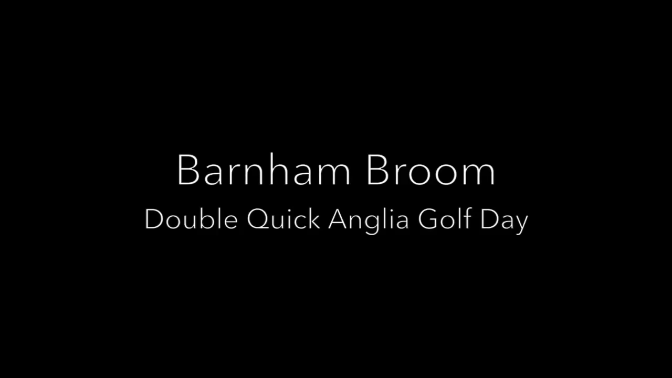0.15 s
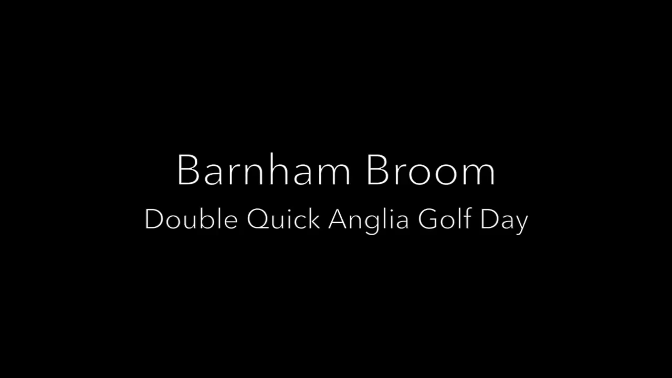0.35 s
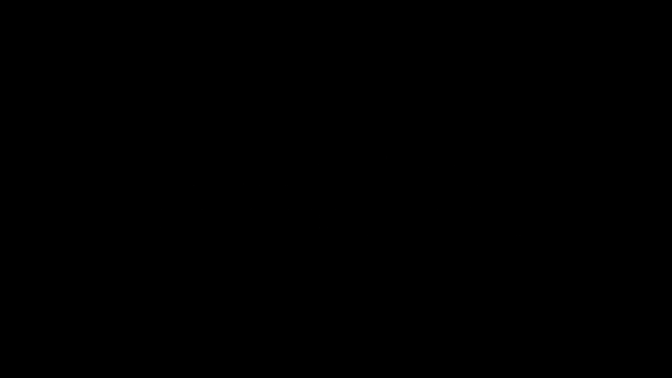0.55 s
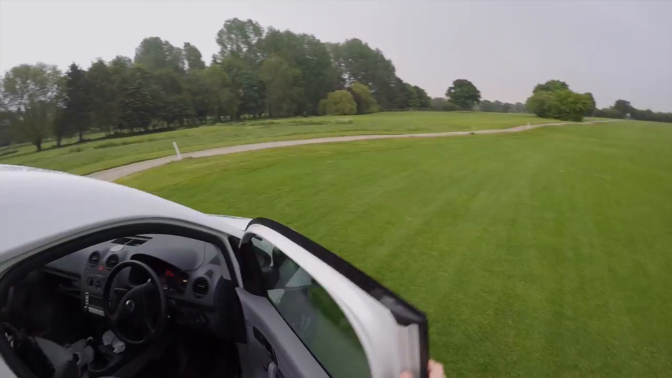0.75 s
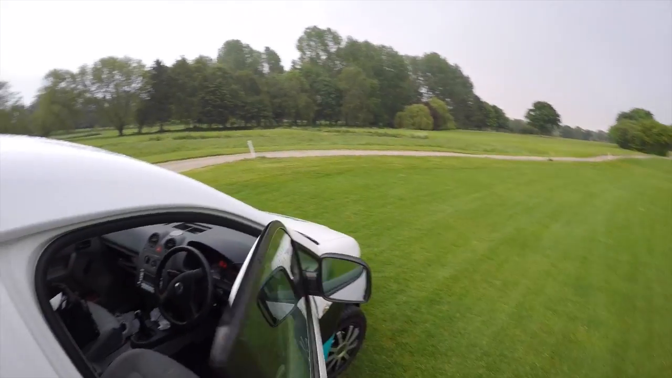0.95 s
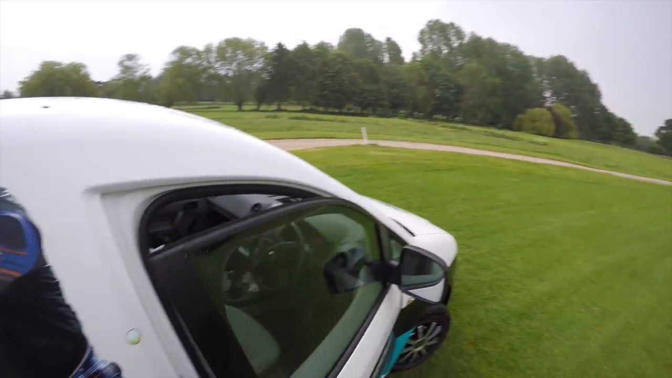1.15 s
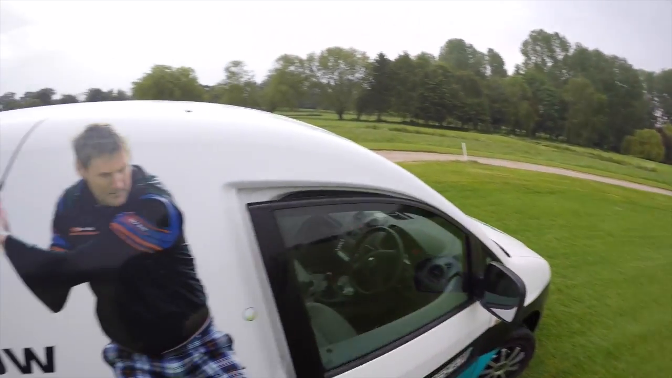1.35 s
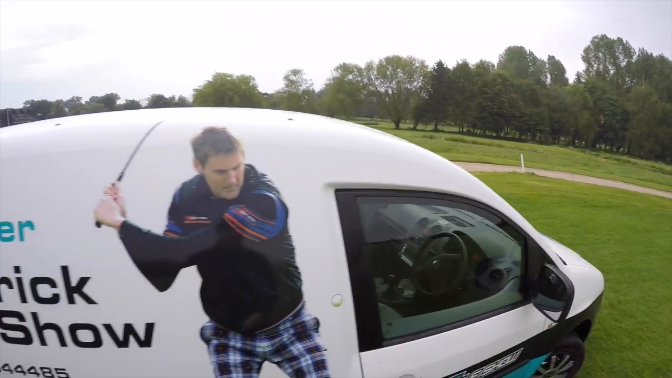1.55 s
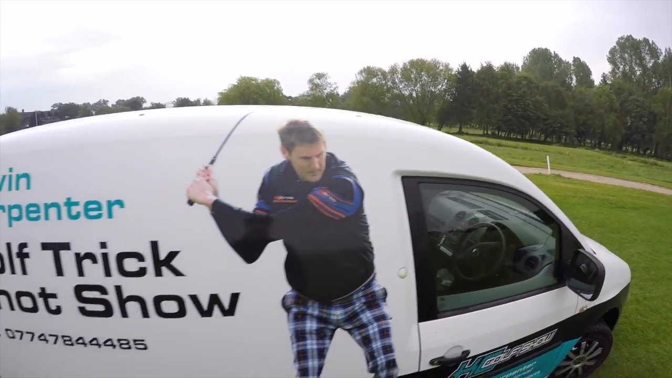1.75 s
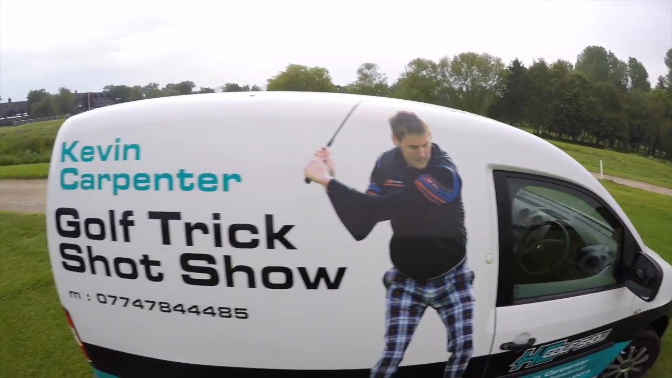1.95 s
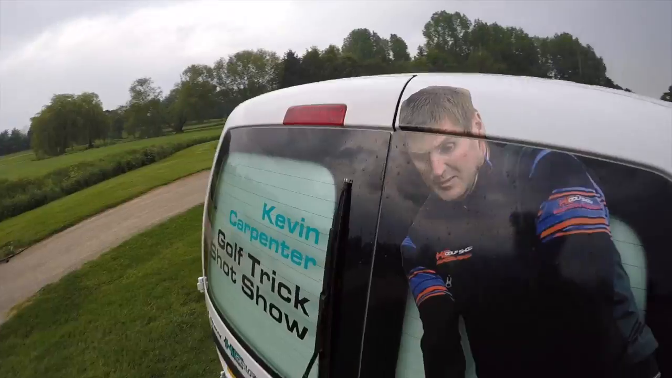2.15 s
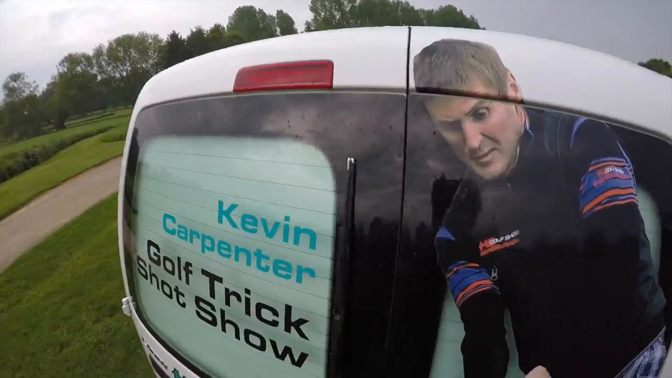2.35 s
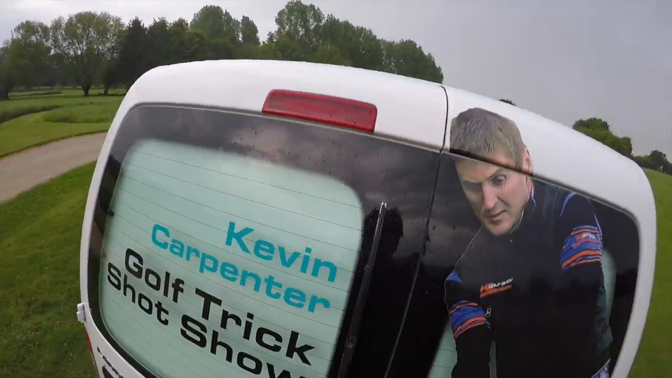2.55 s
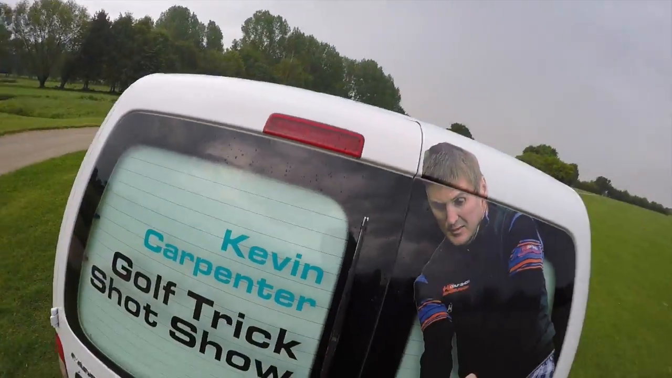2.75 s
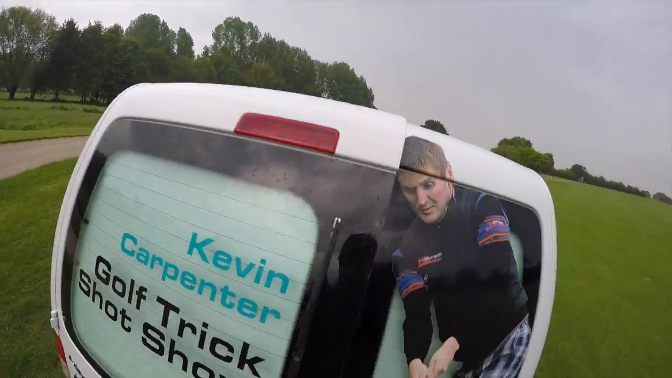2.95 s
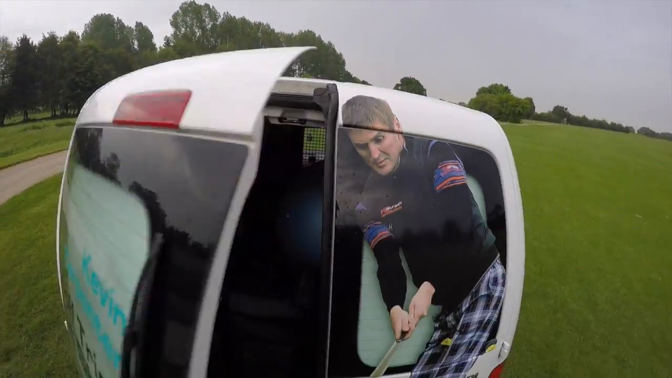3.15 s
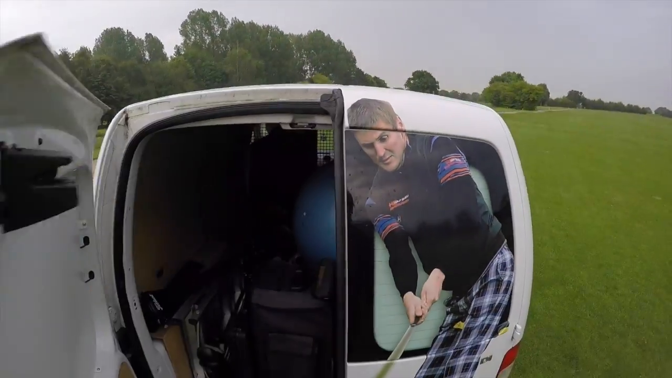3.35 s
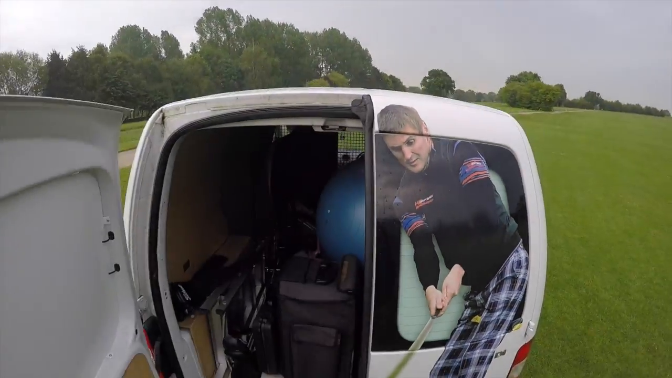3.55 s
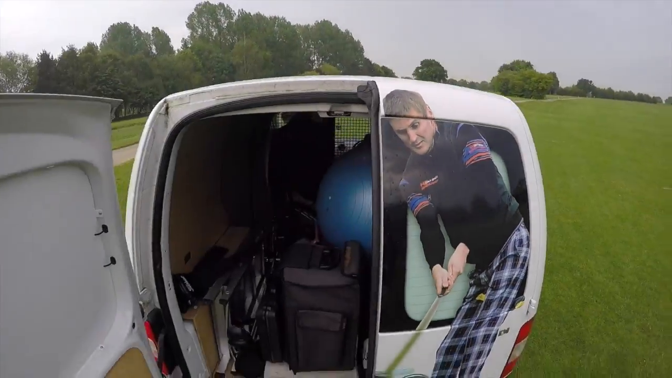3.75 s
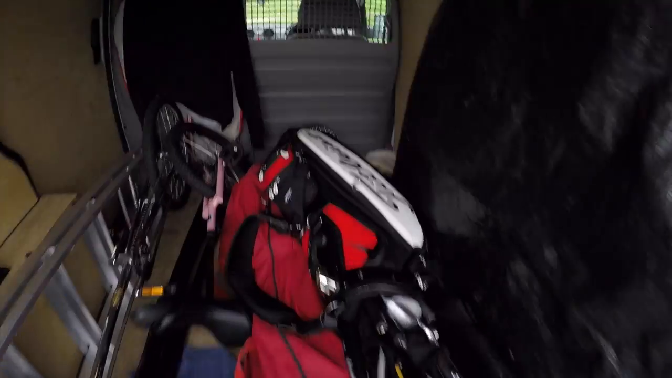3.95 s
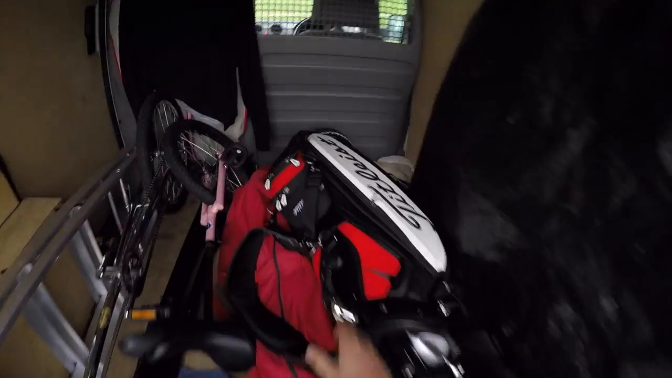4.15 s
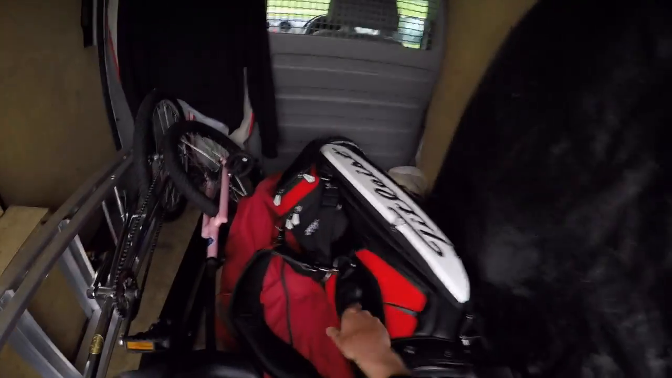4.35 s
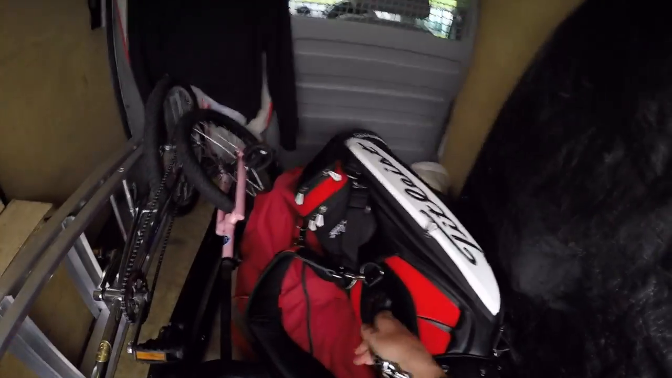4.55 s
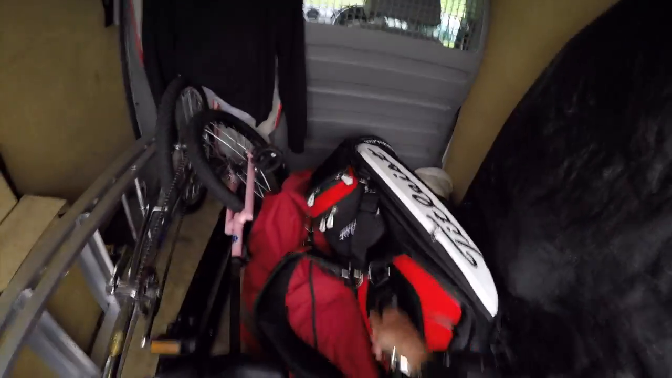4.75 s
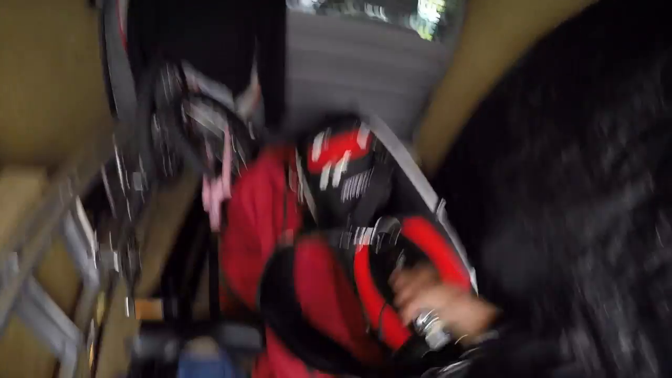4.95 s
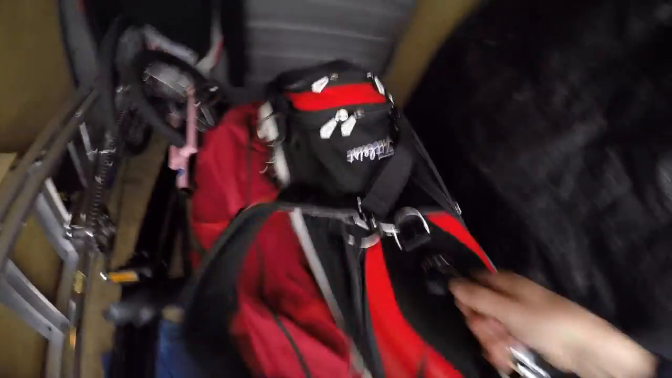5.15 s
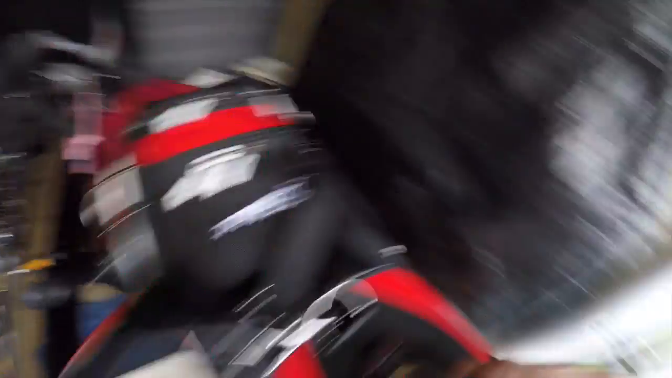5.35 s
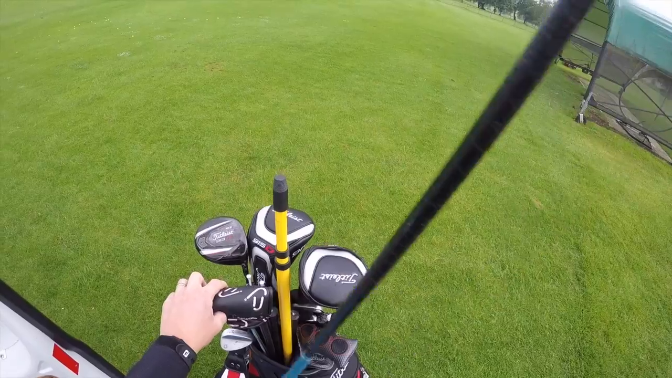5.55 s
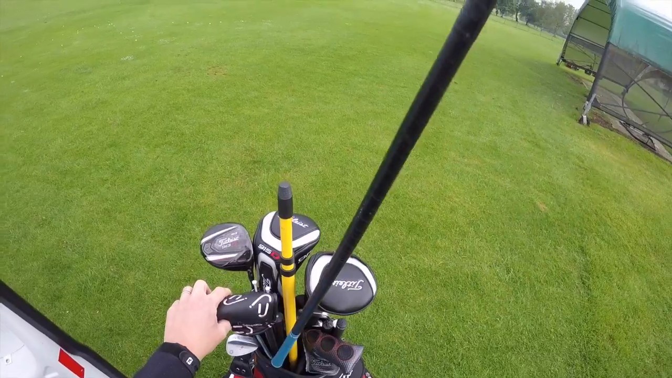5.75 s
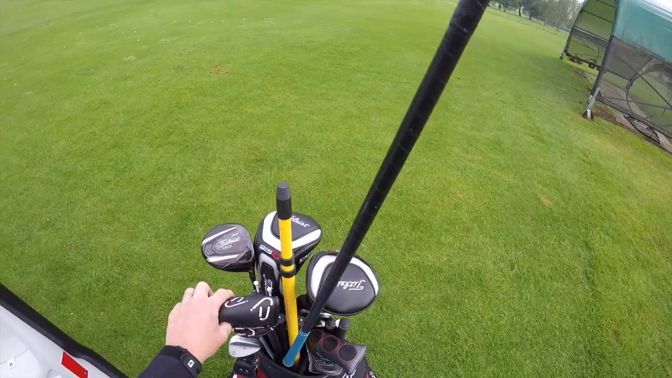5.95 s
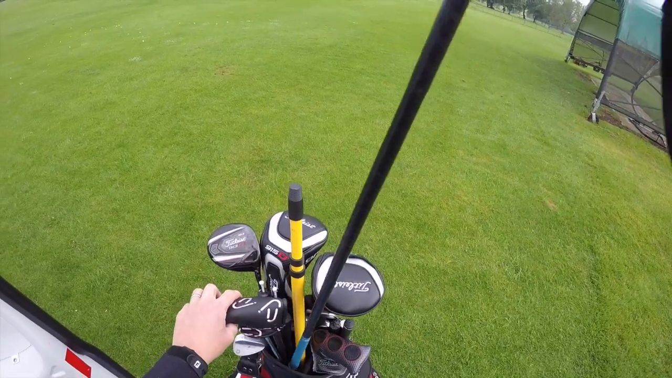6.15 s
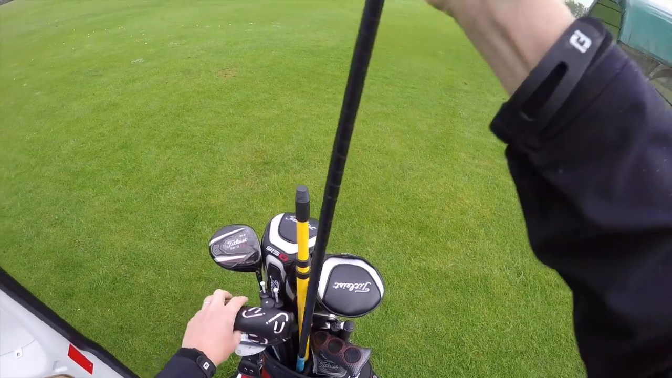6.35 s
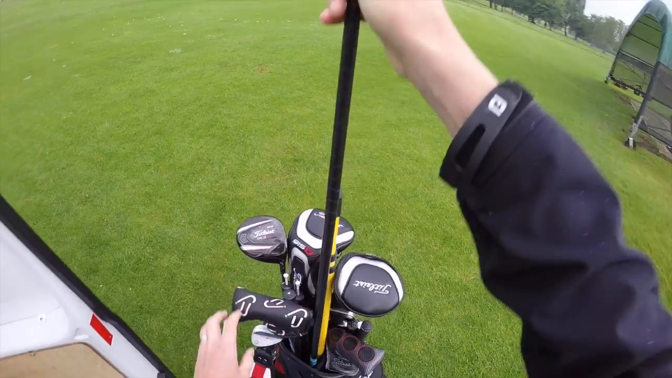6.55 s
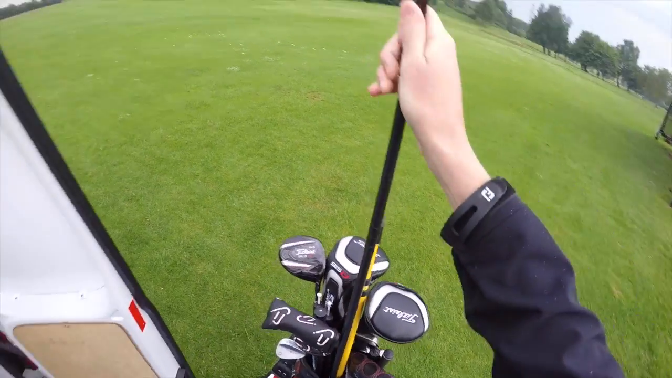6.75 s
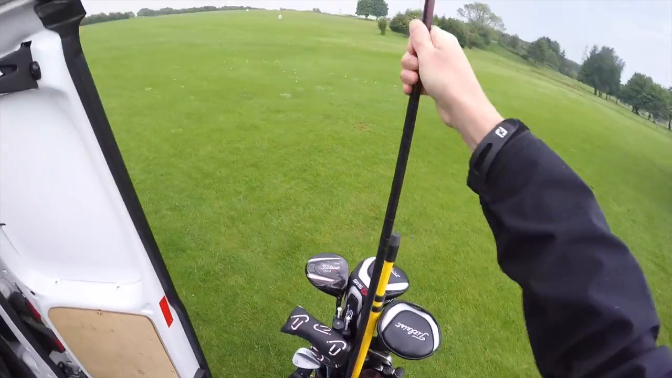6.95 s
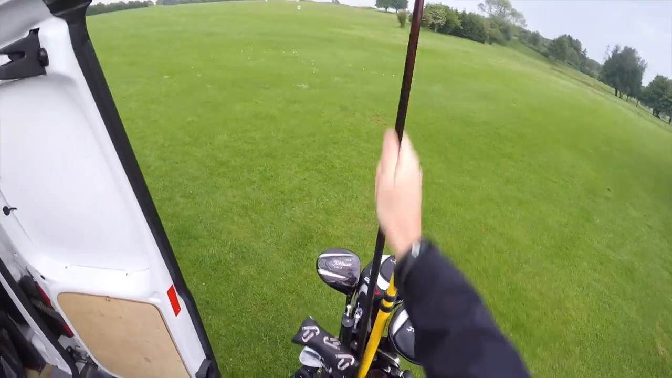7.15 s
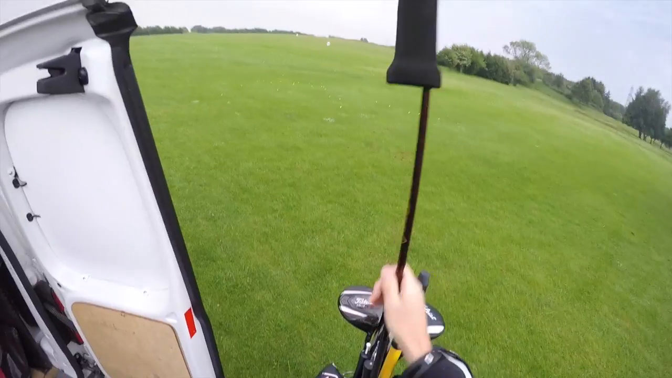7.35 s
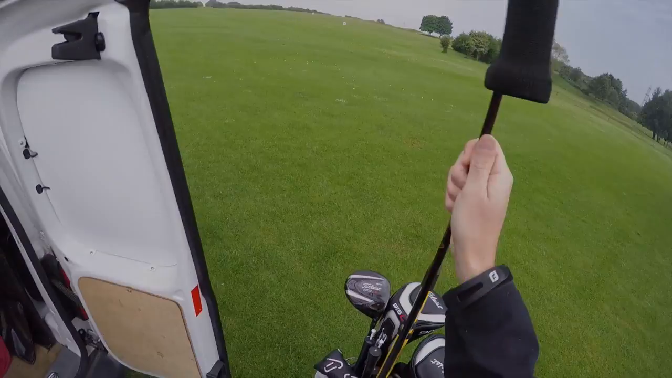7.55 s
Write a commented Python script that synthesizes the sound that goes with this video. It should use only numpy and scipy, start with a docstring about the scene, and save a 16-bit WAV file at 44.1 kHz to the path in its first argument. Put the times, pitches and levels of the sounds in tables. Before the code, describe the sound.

A boomy vehicle door slam, a metallic latch clunk and creak, then golf clubs knocking and nylon dragging, with faint birds in open air.

```python
"""A van's cab door is slammed, then its rear door unlatches and swings onto its stay: modal ringing.
A nylon golf bag is dragged over the load floor by stick-slip grains while a club head pings.
Clubs knock and jostle in it before, during and after the drag; a shaft slides out late; a sleeve rustles.
Shaped noise makes the breeze and open air of the golf course; gliding sines make its far-off birds.
All is heard at one cased microphone worn by the person."""
import sys
import numpy as np
from scipy import signal
from scipy.fft import rfft, irfft, next_fast_len
from scipy.io import wavfile
from scipy.ndimage import uniform_filter1d

SR = 44100
rng = np.random.default_rng(int(sys.argv[2]) if len(sys.argv) > 2 else 0)


def digitize_waveform(pressure):
    """Quantize a signal to 16-bit integers and store it at the path in sys.argv[1].

    Rows of a 2-D input are taken as channels; values are limited to [-1, 1].
    """
    field = np.atleast_2d(pressure).T
    bounded = np.clip(field, -1, 1)
    quanta = np.round(bounded * 32767).astype(np.int16)
    wavfile.write(sys.argv[1], SR, quanta)


N = 334586
TIME = np.arange(N) / SR
RING = 20480  # samples in one ringing sound


def undb(db):
    """Level: decibels become an amplitude ratio."""
    return 10 ** (np.asarray(db) / 20)


def unit(x, size=None):
    """Normalisation: rms 1 over the first samples, or over all."""
    return x / np.sqrt(np.mean(x[:size] ** 2) + 1e-24)


def curve(rows, axis=1):
    """Linear interpolation of a table column in time."""
    rows = np.array(rows)
    return np.interp(TIME, rows[:, 0], rows[:, axis])


def swell(rows, axis=1):
    """Amplitude envelope from a dB column, silent outside its span, with softened ends."""
    inside = (TIME >= rows[0][0]) & (TIME <= rows[-1][0])
    return undb(curve(rows, axis)) * uniform_filter1d(1. * inside, size=400)


def strokes(rows, attack_s, release_s, axis=2):
    """Energy summation of movements: each rises, holds, then falls 30 dB per release time."""
    power = np.zeros(N)
    for row in rows:
        start, length = row[:2]
        rise = np.sin(np.pi / 2 * np.clip((TIME - start) / attack_s, 0, 1)) ** 2
        fall = undb(-30 * np.maximum(TIME - start - length, 0) / release_s)
        power += (undb(row[axis]) * rise * fall) ** 2
    return np.sqrt(power)


def at_hz(points, hz):
    """Linear interpolation of (Hz, value) points on a log-frequency axis."""
    f, value = np.transpose(points)
    return np.interp(np.log(hz + 1e-9), np.log(f), value)


def colour(x, points):
    """Spectral shaping by multiplication in the frequency domain, at rms 1."""
    size = next_fast_len(N)
    gain = undb(at_hz(points, np.fft.rfftfreq(size, 1 / SR)))
    return unit(irfft(rfft(x, size) * gain, size)[:N])


def butter(x, hz, kind):
    """Fourth-order low- or high-pass filtering."""
    return signal.sosfilt(signal.butter(4, hz, kind, fs=SR, output="sos"), x)


def walk(rate):
    """Random modulation: smoothed chance, drawn anew at the given rate per second, at rms 1."""
    k = int(SR / rate)
    return unit(uniform_filter1d(np.repeat(rng.standard_normal(N // k + 1), k), k)[:N])


def grains(rate, spread_db):
    """Impulsive excitation: tiny random slips per second, of very unequal size, at rms 1."""
    chance, size, sign = rng.random(N), rng.exponential(size=N), rng.standard_normal(N)
    return unit((chance < rate / SR) * np.sign(sign) * undb(spread_db * np.minimum(size, 5)))


def add(out, s, sound):
    """Superposition of a sound at a given time."""
    i = int(s * SR)
    out[i:i + len(sound)] += sound[:N - i]


def ring(modes, detune=0):
    """Modal superposition: exponentially decaying sines, each optionally pulled off pitch."""
    t = TIME[:RING]
    pull = 1 + detune * rng.standard_normal(len(modes))
    out = np.zeros(RING)
    for (hz, db, t60), p in zip(modes, pull):
        out += undb(db) * np.sin(2 * np.pi * hz * p * t) * np.exp(-np.log(1000) * t / t60)
    return out


def taps(events, modes):
    """Impulse response: every tap rings the same modes of one object."""
    out, sound = np.zeros(N), ring(modes)
    for s, db in events:
        add(out, s, undb(db) * sound)
    return out


def blows(events, modes, spectrum, decay, modes_db, tail_db, favour_db):
    """Modal density: a blow excites clear modes among countless dense ones, and a hard contact crack."""
    t, out = TIME[:RING], np.zeros(N)
    hz = np.fft.rfftfreq(RING, 1 / SR) + 1e-9
    centres = 125 * 2. ** np.arange(8)
    overlap = np.maximum(0, 1 - np.abs(np.log2(hz / centres[:, None])))
    octaves = overlap * undb(at_hz(spectrum, hz))
    fall = np.log(1000) * t / at_hz(decay, centres)[:, None]
    contact = 1 - np.exp(-(t / 0.00045) ** 2)
    for s, db, click_db, favoured_hz, length in events:
        length = max(length, .2)

        def favour(f):
            """Mode coupling: the place that is struck favours one group of modes."""
            return favour_db * np.exp(-(np.log2(f / favoured_hz) / 0.22) ** 2)

        phases = np.exp(2j * np.pi * rng.random(len(hz)))
        bands = irfft(octaves * undb(favour(hz)) * phases)
        # most of the energy radiates at once, a weak part lingers
        late = np.exp(-fall / length)
        dense = (bands * (late ** 3 + undb(tail_db) * late)).sum(axis=0) * contact
        struck = [(f, mode_db + favour(f), t60 * length) for f, mode_db, t60 in modes]
        clear = unit(ring(struck, detune=.008) * contact, size=500)
        body = unit(butter(dense, 1500, "low"), size=500) + undb(modes_db) * clear
        click = unit(butter(dense, 1500, "high"), size=400)
        sound = unit(body, size=500) + undb(click_db) * click
        add(out, s, undb(db) * sound / np.sqrt(8))  # peaks stand about 9 dB over the rms
    return out


# wind rumble spectrum: f/Hz, level/dB
BUFFET = [(10, -29), (20, 5.5), (36, 1), (58, 5), (85, -2), (110, -11.5), (240, -27.5), (400, -34.5),
          (900, -96)]
# gusts, before the trims in wind(): peak t/s, Gaussian half-width/s, level/dB
GUSTS = [(.75, 0.11, -32.5), (1.08, .11, -27), (1.26, 0.025, -32.5), (1.68, 0.17, -30.5),
         (2.33, 0.077, -27), (2.5, 0.081, -33), (2.95, 0.11, -33.5), (4.65, 0.036, -40), (4.96, 0.12, -29),
         (5.42, 0.086, -35.5), (5.78, 0.061, -37.5), (6.3, 0.18, -50)]
BREEZE_DB = -45  # steady breeze, before the same trims


def wind():
    """Turbulent pressure: eddies rumble at the microphone; stronger gusts shed smaller, higher ones."""
    power = undb(BREEZE_DB) ** 2
    for s, width, db in GUSTS:
        power = power + (undb(db) * np.exp(-((TIME - s) / width) ** 2 / 2)) ** 2
    gust = np.sqrt(power)
    rumble = colour(rng.standard_normal(N), BUFFET)
    eddy_spectrum = [(40, -16), (110, 5), (200, -8), (400, -24), (1200, -59), (4000, -90.0)]
    eddies = colour(rng.standard_normal(N), eddy_spectrum)
    return gust * (undb(-2.0) * rumble + undb(-12.0) * gust / gust.max() * eddies)


# open-air spectrum: f/Hz, level/dB
AIR = [(88, -12.5), (150, -6), (262, -10), (400, -3.5), (650, -6.5), (1000, -13.5), (1350, -20),
       (2140, -21), (2810, -18), (3400, -20.5), (4910, -22), (7080, -29.5), (10000, -34), (15000, -35)]
AIR_DB, AIR_GRASS_DB, ON_GRASS_S = -56.5, -53.5, 6.6  # beside the van, then out on the grass


def open_air():
    """Diffuse field: distant trees and traffic blend to noise, wavering a little."""
    level_db = np.where(TIME < ON_GRASS_S, AIR_DB, AIR_GRASS_DB)
    return colour(rng.standard_normal(N), AIR) * undb(level_db + 0.25 * walk(9.9))


# far whistles, before flutter: t/s, length/s, middle f/Hz, glide/octaves, arch/octaves, level/dB
WHISTLES = [(.68, .09, 2550, .33, .08, -67), (1.26, .15, 2100, .03, .04, -67),
            (2.13, .04, 3620, -.12, 0, -66), (2.44, .05, 3680, .1, 0, -65), (2.66, .05, 3950, -.14, 0, -65),
            (3.12, .06, 2400, .45, 0, -63), (3.48, .13, 2130, -.03, .01, -63),
            (5.81, .18, 3490, .16, .37, -66), (7.33, .14, 2000, -.02, 0, -68)]
# another bird repeats one short rising chip: t/s
CHIPS = [5.87, 5.955, 6.04, 6.205, 6.27, 6.47, 6.605]
CHIP_S, CHIP_HZ, CHIP_GLIDE_OCTAVES, CHIP_DB = .017, 2030, .4, -61.5  # level before flutter
CHIP_SCATTER_OCTAVES = .07  # random spread of pitch from chip to chip


def birds():
    """Frequency modulation and scattering: gliding or arching notes are trailed by echoes from the trees."""
    notes = list(WHISTLES)
    for s in CHIPS:
        hz = CHIP_HZ * 2 ** (CHIP_SCATTER_OCTAVES * rng.standard_normal())
        notes.append((s, CHIP_S, hz, CHIP_GLIDE_OCTAVES, 0, CHIP_DB))
    out = np.zeros(N)
    for s, length, middle_hz, glide, arch, db in notes:
        u = np.linspace(-1, 1, int(length * SR))
        hz = middle_hz * 2 ** (glide * u / 2 - arch * u ** 2)
        envelope = np.sqrt(2 * (1 - u ** 2))
        add(out, s, undb(db) * envelope * np.sin(2 * np.pi * np.cumsum(hz) / SR))
    out = out * undb(3.5 * walk(90) - 3.5)  # moving air makes far notes flutter
    trees = rng.standard_normal(RING) * np.exp(-np.log(1000) * TIME[:RING] / 0.43)
    return out + undb(-4.0) * signal.fftconvolve(out, trees / np.linalg.norm(trees))[:N]


# arm movements that rub the jacket sleeve: start t/s, length/s, level/dB
SLEEVE = [(.93, 0.19, -63.5), (2.18, 0.15, -59.5), (3.83, 0.54, -54.5), (4.4, 0.78, -57),
          (6.25, 0.095, -52.5), (6.5, 0.11, -57), (6.68, 0.34, -62), (7.08, .19, -56.5)]
# cloth spectrum: f/Hz, level/dB
CLOTH = [(530, -33), (900, -14), (1490, -11), (2100, -6.5), (2950, 0), (3400, -4.5), (4400, -6.5),
         (5000, -4), (8330, -18.5), (9600, -17), (11500, -20.5), (13700, -16), (15000, -17)]
ARM_ATTACK_S, ARM_RELEASE_S = 0.053, 0.2


def sleeve():
    """Friction noise: jacket cloth brushes over itself as the arm moves."""
    rustle = colour(grains(rate=8000, spread_db=2.0), CLOTH) * undb(1.1 * walk(35))
    return rustle * strokes(SLEEVE, ARM_ATTACK_S, ARM_RELEASE_S)


# handles, lock and stay: t/s, nominal peak level/dB, relative click level/dB, favoured f/Hz, t60 factor
LOCKS = [(0.995, -26.5, -12.5, 607, 0.73), (1.353, -34, -18, 614, 0.79), (2.488, -38, -23, 620, 0.73),
         (2.528, -36, -15, 1010, 0.5), (2.561, -46, 4, 890, 1.9), (2.710, -33.5, -7, 840, 1.1),
         (2.749, -31.5, -16, 660, 3), (2.782, -11, -16.5, 800, 0.6), (2.788, -10, -21.5, 484, 0.49),
         (2.799, -19.5, -18, 400, 1.5), (2.835, -30, -18, 600, 2), (2.859, -16.5, -36, 634, 0.57),
         (2.870, -18, -26.5, 740, 1.32), (3.199, -29.5, 1.5, 1160, 1), (3.205, -21, -1, 940, 1.33),
         (3.213, -20.5, -18, 720, 0.89), (3.223, -26, -21, 156, 0.91)]
# rear door skin, before favouring and t60 factor: f/Hz, level/dB, t60/s
REAR_MODES = [(174.5, -10.5, 0.44), (288, -1, 0.33), (421, 4, 0.16), (470, -6, 0.043), (514, 2.5, 0.1),
              (629, -4, 0.27), (696, -4, 0.26), (780, -13, 0.36), (846, -3, 0.087), (975, -11, 0.18),
              (1062, -8, 0.13)]
# dense ringing spectrum: f/Hz, level/dB
LOCK_COLOUR = [(60, -6), (100, 2.5), (274, -5), (345, -3.5), (524, -3), (800, -12), (1200, -15.5),
               (1630, -25.5), (2750, -14.5), (3400, -19), (5000, -26), (8000, -36.5), (11000, -45),
               (15000, -52)]
# dense ringing decay, before the t60 factor: f/Hz, t60/s
LOCK_DECAY = [(120, 0.55), (550, 0.43), (1200, 0.21), (3000, 0.095), (6000, 0.19), (15000, 0.12)]


def door_locks():
    """Impact excitation: handles, lock and stay strike the ringing door skin."""
    return blows(LOCKS, REAR_MODES, LOCK_COLOUR, LOCK_DECAY, modes_db=-5.5, tail_db=-11.0, favour_db=7.0)


# door meets seal and latch: t/s, nominal peak level/dB, relative click level/dB, favoured f/Hz, t60 factor
SLAM = [(1.507, -15.5, -17.5, 497, 1.2), (1.523, -8.5, -6.5, 700, 0.79), (1.530, -1, -21, 550, 0.42),
        (1.537, -13.5, 1, 650, .6), (1.560, -3, -7, 690, 0.6), (1.563, -1, -31, 257, 0.98),
        (1.576, -17, -33, 243, 1.54), (1.601, -16, -31, 570, 1.05), (1.625, -27, -19, 650, 1.06)]
# door panel, before favouring and t60 factor: f/Hz, level/dB, t60/s
PANEL_MODES = [(132.3, 2.5, 0.42), (189, -3.5, 0.28), (265.4, 5.5, 0.11), (333, 5, 0.24), (408, -5, 0.24),
               (474, -5, 0.15), (536, 0.5, 0.22), (564, 1, 0.14), (616, -9, 0.09), (724, -13, .17),
               (944, -2, 0.13)]
# dense ringing spectrum: f/Hz, level/dB
SLAM_COLOUR = [(59, -18), (100, 5), (268, -2), (391, 2.5), (620, 2), (983, -15.5), (1490, -20), (2420, -14),
               (3390, -23), (5480, -23), (8000, -35), (15000, -51)]
# dense ringing decay, before the t60 factor: f/Hz, t60/s
SLAM_DECAY = [(120, 0.6), (300, 0.45), (650, 0.27), (1400, 0.22), (3000, 0.21), (5500, 0.17), (15000, 0.14)]
# the door's push on the cab air: t/s, level/dB
BOOMS = [(1.527, -10.5), (1.554, -10), (1.573, -6)]
# cab air and shell: f/Hz, level/dB, t60/s
CAB_MODES = [(26.45, -14.5, 0.92), (37, -5, 0.2), (46.5, 1, 0.24), (54.4, -11.5, 0.44), (90, -19.5, 0.52),
             (130.6, -20, 0.31)]


def cab_door():
    """Cavity resonance: the door meets seal and latch in several blows while it pumps the cab air."""
    slam = blows(SLAM, PANEL_MODES, SLAM_COLOUR, SLAM_DECAY, modes_db=-3.0, tail_db=-13.5, favour_db=6)
    return slam + taps(BOOMS, CAB_MODES)


# the rear seal lets go: t/s, level/dB
RELEASE = [(2.781, -20.5), (2.809, -27.5)]
# load bay air: f/Hz, level/dB, t60/s
BAY_MODES = [(33, -6, 0.32), (60.2, 1.5, 0.38), (105, 0.5, 0.095)]


def seal_release():
    """Cavity resonance: the rear seal pops free and the load bay answers."""
    return taps(RELEASE, BAY_MODES)


# rear door swing: start t/s, length/s, level/dB
SWING = [(2.95, 0.43, -50)]
# door skin spectrum: f/Hz, level/dB
SKIN = [(80, -12), (150, 4), (240, -4), (450, 3.5), (800, -6.5), (1400, -22), (3000, -22), (8000, -38.5)]
SWING_ATTACK_S, SWING_RELEASE_S = 0.13, 0.67


def door_shudder():
    """Panel vibration: small random impulses shake the skin as the rear door swings."""
    shudder = colour(grains(rate=500, spread_db=-0.5), SKIN)
    return shudder * strokes(SWING, SWING_ATTACK_S, SWING_RELEASE_S)


# rear hinge, before jitter and trim: t/s, slip rate f/Hz, level/dB
HINGE = [(3.04, 320, -62), (3.085, 360, -43), (3.12, 420, -43), (3.17, 450, -48), (3.22, 440, -62)]


def hinge_groan():
    """Stick-slip relaxation oscillation: an unsteady sawtooth follows the hinge's slip rate."""
    phase = np.cumsum(curve(HINGE) * (1 + 0.092 * walk(180))) / SR
    slips = butter(signal.sawtooth(2 * np.pi * phase), 820, "low")
    return undb(-1.5) * unit(slips * undb(2.2 * walk(60))) * swell(HINGE, axis=2)


# the steel stay snaps in: t/s, level/dB
STAY = [(3.204, -31.5)]
# rings of the stay and the door: f/Hz, level/dB, t60/s
STAY_MODES = [(158, -16, .25), (573, -3, 0.33), (683, -9, 0.65), (788, -13.5, 0.74), (968, -8, 0.22),
              (1300, -11, 0.093), (2060, -12, .05), (2660, -11, 0.08), (4340, -5, 0.04), (4970, 2.5, 0.04),
              (12300, -5, 0.033), (13700, -2, .02)]


def stay_snap():
    """Modal ringing: the steel stay snaps in and rings with the door."""
    return taps(STAY, STAY_MODES)


# spells in which loose clubs jostle: start t/s, length/s, level/dB
JOSTLE = [(3.53, 0.57, -56), (4.6, 0.78, -53), (6.05, 1.18, -56.5)]
# bag tube, before any favouring and t60 factor: f/Hz, level/dB, t60/s
BAG_MODES = [(120, 13.5, 0.067), (195, -13, 0.14), (297, 1.5, 0.075), (458, 3, 0.024), (567, 1, 0.14),
             (648, -5, 0.094), (897, -3, 0.051), (1043, -6.5, 0.12)]
# spectrum of knocks and jostling: f/Hz, level/dB
KNOCK_COLOUR = [(59, -25), (100, 4.5), (416, 3), (600, -2), (950, -10), (1630, -19.5), (2700, -8),
                (3300, -15), (4200, -15), (7800, -29.5), (15000, -35)]
JOSTLE_ATTACK_S, JOSTLE_RELEASE_S, JOSTLE_PER_S = .06, .25, 60


def jostling():
    """Random impact series: loose clubs tick against each other and ring the bag."""
    ticks = grains(rate=JOSTLE_PER_S, spread_db=3.0)
    ringing = unit(signal.fftconvolve(ticks, ring(BAG_MODES[2:]))[:N])
    jostle = unit(colour(ticks, KNOCK_COLOUR) + ringing)
    return jostle * strokes(JOSTLE, JOSTLE_ATTACK_S, JOSTLE_RELEASE_S)


# shafts and grips in the bag: t/s, nominal peak level/dB, relative click level/dB, favoured f/Hz, t60 factor
KNOCKS = [(3.742, -34.5, -20, 636, 2.1), (3.838, -32, -30, 305, 0.93), (3.923, -25, -17.5, 474, 0.64),
          (4.229, -40.5, -4, 1110, 0.43), (4.304, -38.5, -11, 770, 0.64), (4.366, -41, 0, 794, 4.1),
          (4.827, -23, -10, 1290, 0.82), (4.872, -22, -20, 131, 1.3), (4.896, -25, 7.5, 560, 0.38),
          (4.903, -22.5, 4.5, 570, 1.3), (4.917, -14.5, -18, 254, 0.59), (5.004, -25.5, -4, 140, 0.67),
          (5.062, -19, -23, 590, 1.6), (5.090, -19, -23, 570, 2.25), (5.305, -18, -19, 282, 2.6),
          (5.376, -15.5, -17, 284, 1.05), (5.458, -14.5, -15, 252, 0.37), (5.747, -31.5, -18, 130, 1.6),
          (6.066, -31, -13, 388, 2.2), (6.263, -37.5, -11, 414, 0.68), (6.311, -31.5, -18, 880, 1.8),
          (6.326, -34, -24, 433, 1.1), (6.924, -39, -4.5, 850, 1), (6.999, -33.5, -20, 434, 1),
          (7.099, -35, -5.5, 690, 0.34), (7.166, -38.5, -18, 680, 0.51), (7.199, -26.5, -18, 880, 1.7),
          (7.264, -35.5, -12, 680, 1.8), (7.318, -38, -6, 616, 0.25), (7.399, -39.5, -22, 860, 0.69),
          (7.511, -42.5, -20, 720, 0.5)]
# dense ringing decay, before the t60 factor: f/Hz, t60/s
KNOCK_DECAY = [(120, 0.17), (600, 0.21), (2500, 0.13), (15000, 0.14)]


def club_knocks():
    """Damped impact: shafts and grips knock dully against the bag tube."""
    return blows(KNOCKS, BAG_MODES, KNOCK_COLOUR, KNOCK_DECAY, modes_db=-2.5, tail_db=-8.5, favour_db=14)


# squeaks of webbing and shafts, before jitter: t/s, length/s, start f/Hz, end f/Hz, level/dB
SQUEAKS = [(4.355, 0.051, 3650, 3040, -46), (5.06, 0.044, 1600, 1705, -41.5),
           (5.09, 0.067, 2450, 2734, -40.5), (5.24, 0.053, 2850, 2390, -40.5),
           (5.32, 0.0555, 2650, 2320, -39), (5.40, 0.058, 2700, 2340, -38.5),
           (7.283, 0.03, 2900, 2190, -50.5)]


def squeaks():
    """Stick-slip friction: webbing and shafts make short, hoarse glides."""
    out, waver = np.zeros(N), walk(900)
    for s, length, start_hz, end_hz, db in SQUEAKS:
        size = int(length * SR)
        jitter = 1 + 0.0665 * waver[int(s * SR):][:size]
        hz = np.linspace(start_hz, end_hz, size) * jitter
        add(out, s, undb(db) * 2 * np.hanning(size) * np.sin(2 * np.pi * np.cumsum(hz) / SR))
    return out


# pulls on the bag: start t/s, length/s, scrape level/dB, sliding level/dB before its parts' trims
PULLS = [(4.78, 0.11, -37, -48), (4.87, 0.14, -29.5, -35.5), (5.04, 0.095, -36.5, -35),
         (5.245, 0.17, -32.5, -33.5)]
# load floor and bag shell resonances, before wander: f/Hz, width/Hz, level/dB
FLOOR = [(65, 61, -3), (119, 34, 5.5), (293, 170, -3.5), (440, 120, 5.5), (606, 61, -2.5), (1010, 150, -18),
         (1680, 210, -16)]
# nylon hiss spectrum: f/Hz, level/dB
NYLON = [(700, -10), (1200, -8), (1650, -9), (1900, -3), (2450, 1.5), (3000, 1.5), (3500, -3), (4100, -4),
         (4850, -5.5), (6200, -10.5), (8480, -16.5), (9600, -14.5), (11000, -18.5), (13700, -14.5),
         (15000, -18)]
# shafts that chatter together while the bag moves: f/Hz, level/dB, t60/s
CHATTER = [(880, -3, .05), (1166, -1, 0.069), (1675, -2.5, .05), (2377, 0.5, 0.066), (2637, 1, 0.069),
           (3910, -4, .04)]
CHATTER_PER_S, CHATTER_DB, RASP_DB = 25, -7, -0.74  # touches on each mode; trims of the sliding parts
PULL_ATTACK_S, DRAG_END_S = 0.044, 5.472
SCRAPE_RELEASE_S, RASP_RELEASE_S = 0.24, 0.46  # the cloth keeps sliding after the foot has eased


def bag_drag():
    """Stick-slip excitation: the foot judders over wandering floor modes; nylon rasps, shafts chatter."""
    slips = grains(rate=700, spread_db=-1) * undb(2.4 * walk(45))
    scrape = np.zeros(N)
    for hz, width, db in FLOOR:
        resonance = signal.lfilter(*signal.iirpeak(hz, hz / width, fs=SR), slips)
        scrape += undb(db + 3.7 * walk(22)) * resonance
    scrape = unit(butter(scrape, 1800, "low")) * strokes(PULLS, PULL_ATTACK_S, SCRAPE_RELEASE_S)
    rasp = colour(grains(rate=7000, spread_db=0.5), NYLON) * undb(0.89 * walk(70))
    chatter = np.zeros(N)
    for mode in CHATTER:
        touches = grains(rate=CHATTER_PER_S, spread_db=1.4)
        chatter += signal.oaconvolve(touches, ring([mode]))[:N]
    sliding = undb(RASP_DB) * rasp + undb(CHATTER_DB) * unit(chatter)
    sliding = sliding * strokes(PULLS, PULL_ATTACK_S, RASP_RELEASE_S, axis=3)
    return (scrape + sliding) * uniform_filter1d(1. * (TIME < DRAG_END_S), size=200)


# club heads touch: t/s, level/dB
PINGS = [(4.898, -26)]
# club head: f/Hz, level/dB, t60/s
HEAD_MODES = [(2530, 1.5, 0.06), (2920, 0, 0.56), (3820, 3, 0.073), (4040, 0.5, 0.047), (4900, -4.5, .08),
              (5600, -11, 0.12)]


def head_ping():
    """Lightly damped modes: bare club heads touch and ping."""
    return taps(PINGS, HEAD_MODES)


# sliding shaft spectrum: f/Hz, level/dB
SHAFT = [(2000, -32), (4500, -3), (5900, 2), (7200, -14), (10000, -19), (15000, -17)]
DRAW_START_S, DRAW_FREE_S, DRAW_RELEASE_S = 6.85, 7.29, .04
DRAW_DB, DRAW_RISE_DB_PER_S = -49, 68  # level on coming free, and the rise towards it


def club_draw():
    """Sliding friction: a shaft grows louder as it gathers speed, until it comes free of the bag."""
    slide = colour(rng.standard_normal(N), SHAFT) * undb(1.9 * walk(30))
    movement = [(DRAW_START_S, DRAW_FREE_S - DRAW_START_S, DRAW_DB)]
    rise = undb(DRAW_RISE_DB_PER_S * np.minimum(TIME - DRAW_FREE_S, 0))
    return slide * strokes(movement, ARM_ATTACK_S, DRAW_RELEASE_S) * rise


FADE_START_S, FADE_S = 0.43, 0.31


def scene():
    """Linear superposition of all sources at one microphone, faded in from near silence."""
    fade = np.clip((TIME - FADE_START_S) / FADE_S, 0, 1) ** 2 + undb(-58)
    surroundings = wind() + open_air() + birds() + sleeve()
    doors = door_locks() + cab_door() + seal_release() + door_shudder() + hinge_groan() + stay_snap()
    bag = jostling() + club_knocks() + squeaks() + bag_drag() + head_ping() + club_draw()
    return (fade * (surroundings + doors + bag))[None]


TOP_HZ = 15400


def record(dry):
    """Filtering and saturation: the case dips the upper middle, peaks are rounded, the top is cut."""
    cased = dry - 0.54 * signal.lfilter(*signal.iirpeak(3450, 7, fs=SR), dry)
    top_cut = signal.ellip(10, .2, 80, TOP_HZ, fs=SR, output="sos")
    return signal.sosfilt(top_cut, np.tanh(cased))


dry = scene()
out = record(dry)
digitize_waveform(out)
```